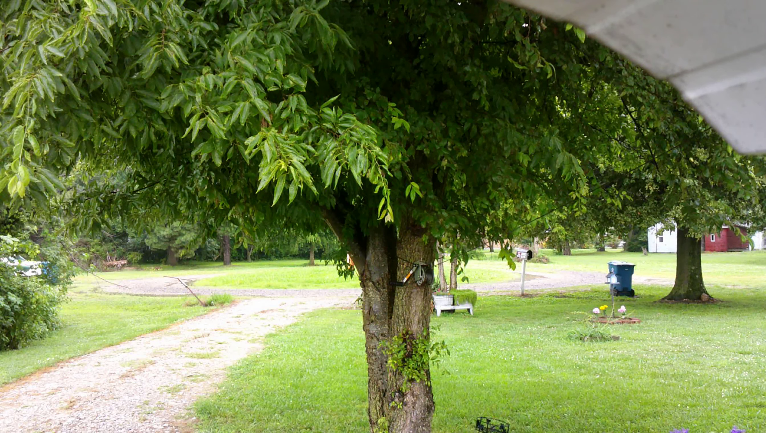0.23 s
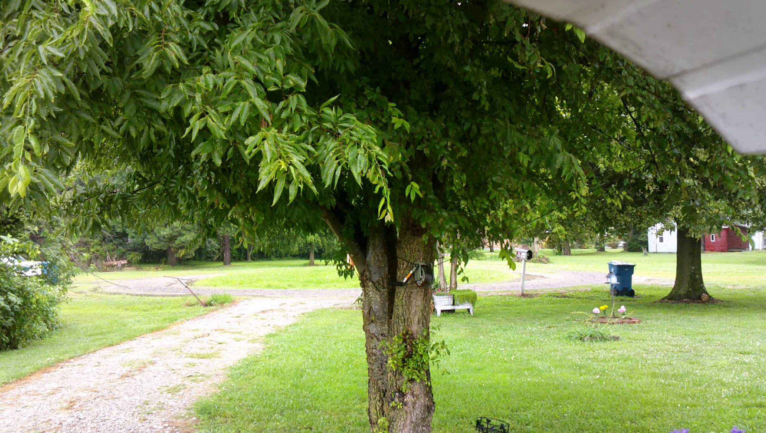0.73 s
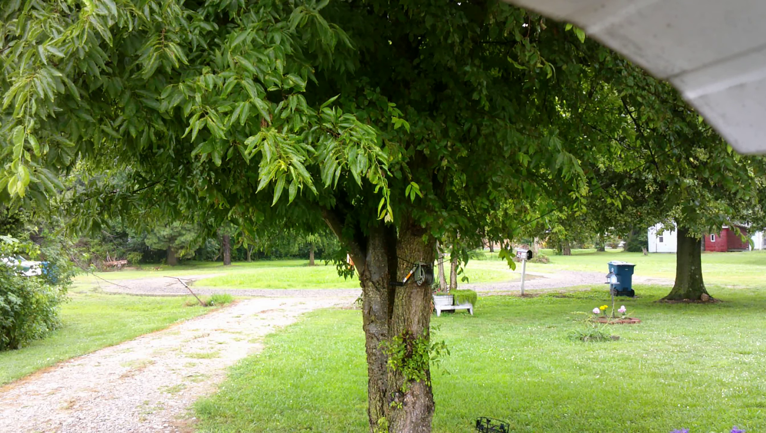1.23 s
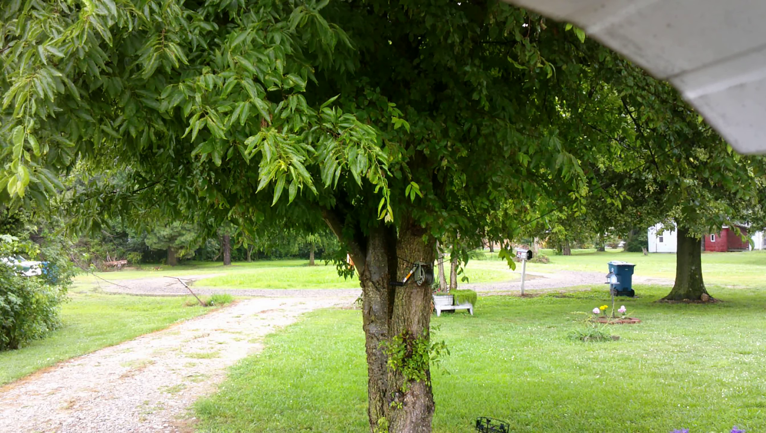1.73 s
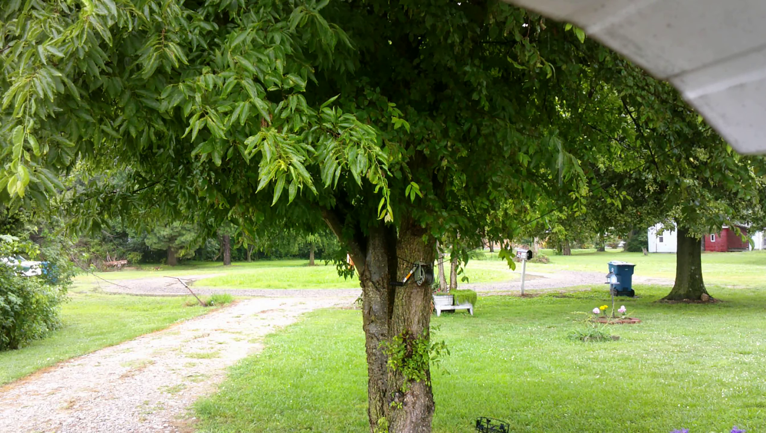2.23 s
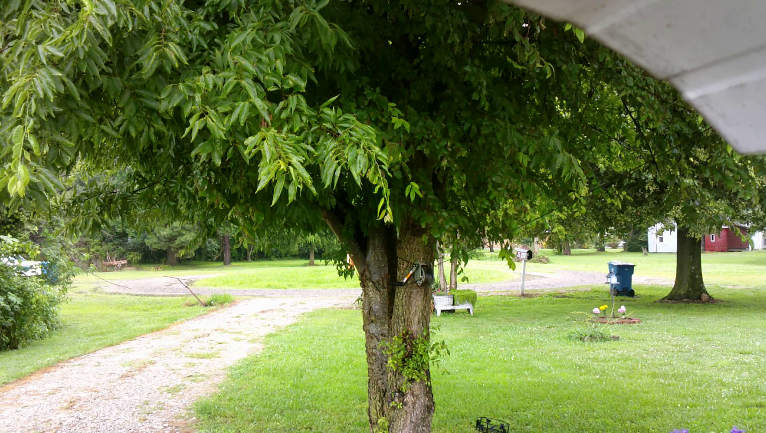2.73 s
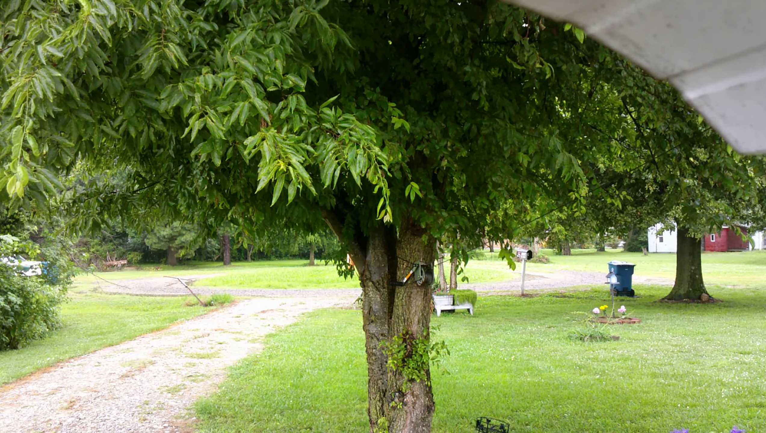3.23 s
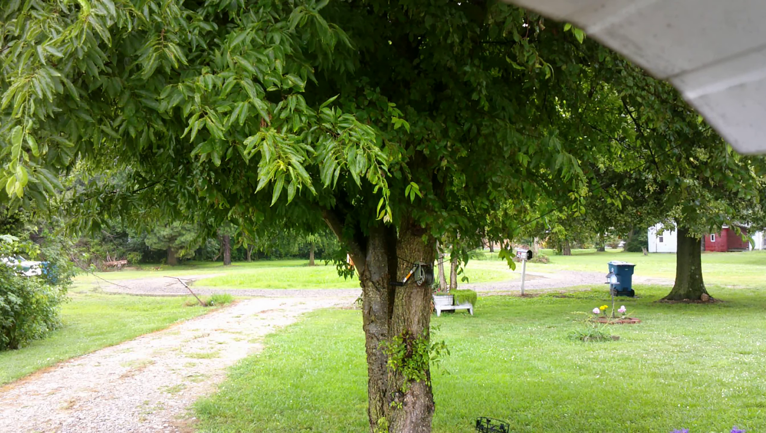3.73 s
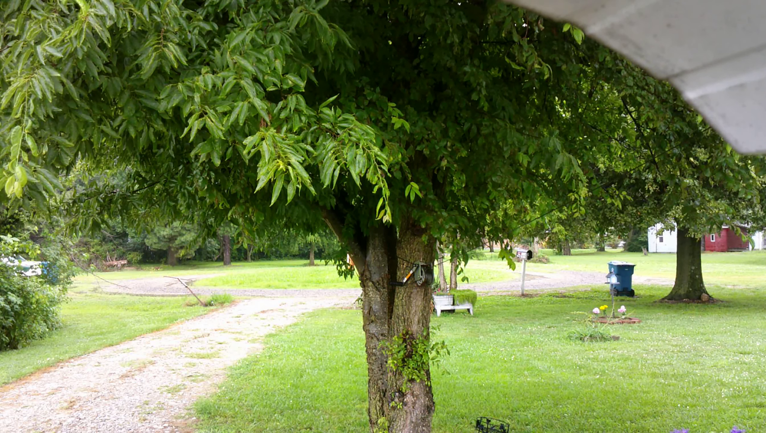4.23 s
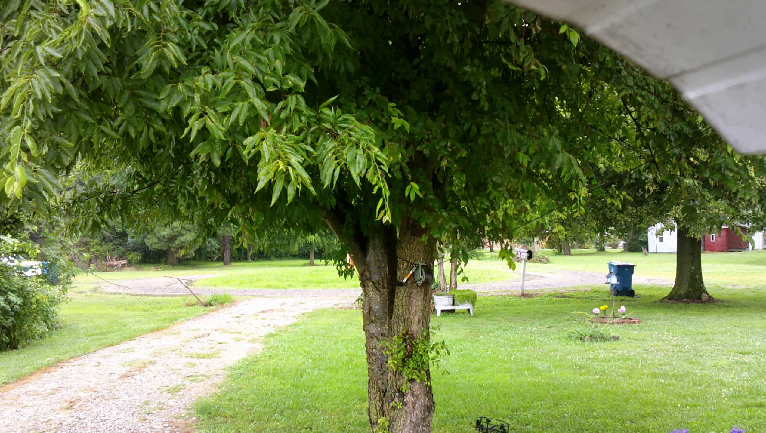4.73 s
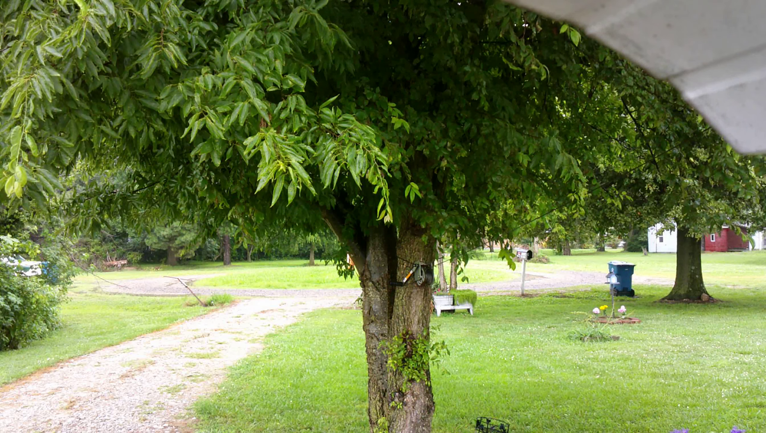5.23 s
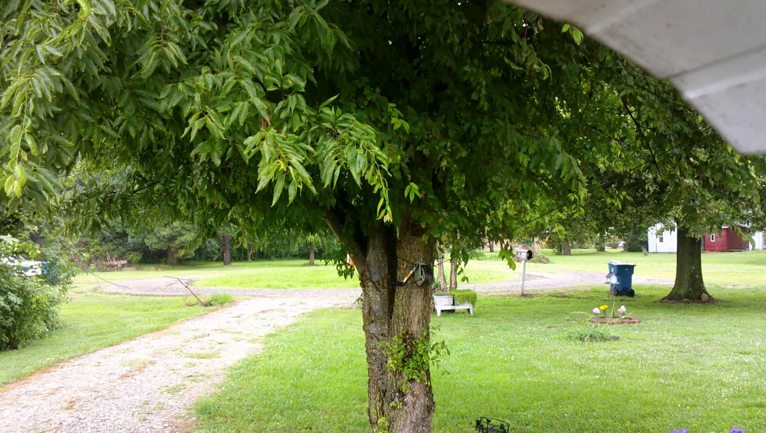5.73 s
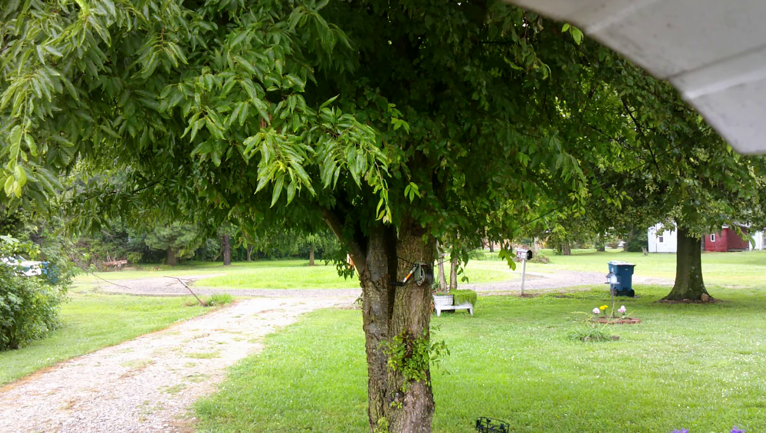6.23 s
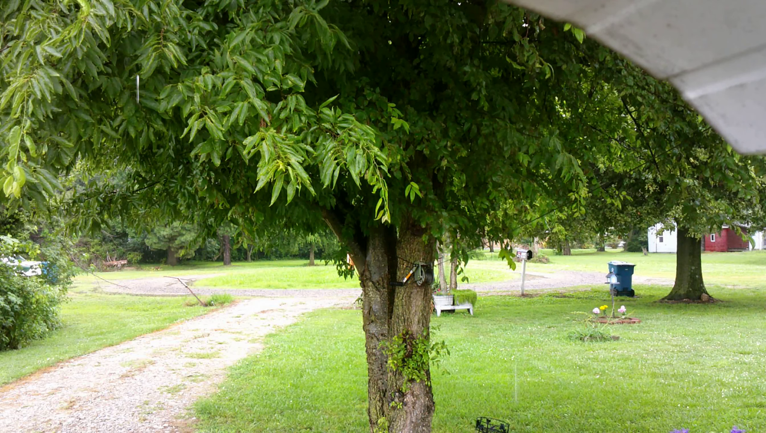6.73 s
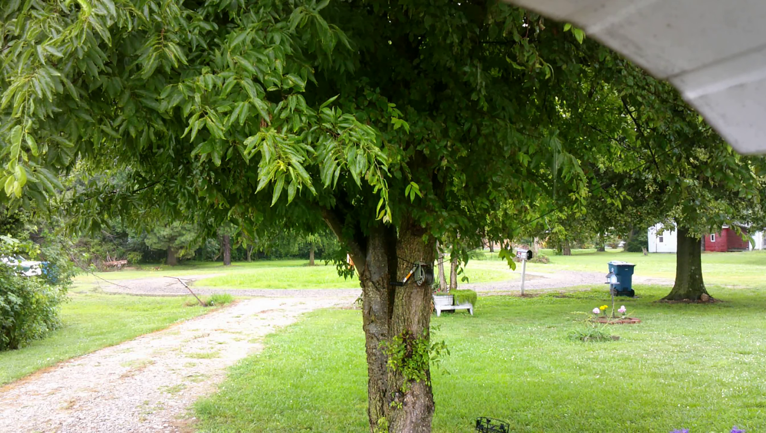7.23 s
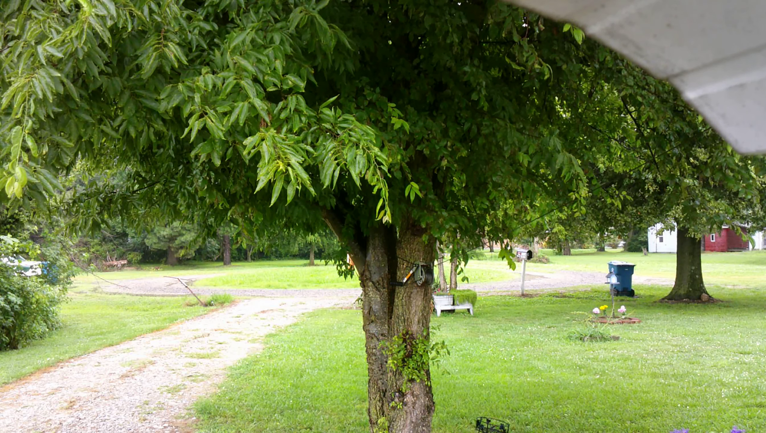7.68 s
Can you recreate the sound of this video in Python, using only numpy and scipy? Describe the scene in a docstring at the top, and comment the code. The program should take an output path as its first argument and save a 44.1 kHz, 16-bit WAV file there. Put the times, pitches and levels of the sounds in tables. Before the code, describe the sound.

Steady rain patters on a thin metal roof just above the listener, a dense, slightly tinny wash. Small sharp ticks run throughout. Heavy drops bang and ring the sheet early on, twice in quick succession near the middle, then again later as the rain becomes thicker and brighter. Heard close, from underneath the roof, beside a leafy yard, over a very faint low rumble.

```python
"""Steady rain drums on a thin metal roof just overhead, heard from under it for about eight seconds.
Countless small drops excite the sheet into a wash of dense modes, over a faint even low rumble.
Sharp ticks, short puffs of resonant noise, run throughout; heavy drops bang and ring the low modes
early on, twice in quick succession near the middle, and again at about 5, 5.6 and 7.4 s.
From about 5.5 s the rain thickens and brightens, and it stays heavier to the end."""
import sys
import numpy as np
from scipy import signal
from scipy.fft import rfft, irfft
from scipy.io import wavfile

SR = 44100
rng = np.random.default_rng(int(sys.argv[2]) if len(sys.argv) > 2 else 0)


def master_out(mix):
    """Clip the mix to full scale and print it as 16-bit PCM to the path in sys.argv[1]."""
    frames = np.transpose(np.atleast_2d(mix))
    ceiling = np.clip(frames, -1, 1)
    pcm = np.round(ceiling * 32767).astype(np.int16)
    wavfile.write(sys.argv[1], SR, pcm)


def rack_gain(trim_db):
    """Turn a fader trim in dB into the linear factor to multiply a signal by."""
    fader = np.asarray(trim_db, float)
    return 10 ** (fader / 20)


N = 350595
RING = int(.9 * SR)  # samples in one blow's response
USUAL_RAIN_DB = -36

# Rainfall over time. Each row: time in seconds, level in dB.
RAINFALL = [(0.0, -35.5), (1.6, -36), (3.2, -35.5), (5.55, -36), (6.7, -33.5), (7.25, -33), (7.95, -33.5)]


def curve(table, hz):
    """Interpolation on a log-frequency axis: read (Hz, value) points at the given frequencies."""
    f, v = np.transpose(table)
    return np.interp(np.log(np.maximum(hz, 1)), np.log(f), v)


def unit(x):
    """Normalisation: scale to rms 1."""
    return x / np.sqrt(np.mean(x ** 2))


def place(at_s, sounds):
    """Superposition with one reflection: each sound comes back once from the floor below."""
    echo_s, echo_db = .0092, -4.5
    out = np.zeros(N + 2 * RING)
    for s, sound in zip(at_s, sounds):
        for lag_s, gain in ((0, 1), (echo_s, rack_gain(echo_db))):
            i = int((s + lag_s) * SR)
            out[i:i + len(sound)] += gain * sound
    return out[:N]


def rain(drops_per_s=3000, size_db=2.0, modes_db=-21.5, spots=36):
    """Shot noise: drops at random moments, convolved with the response of the roof spot they strike."""
    panels = 4
    out = 0
    for k in range(spots):
        chance = rng.random((3, N + RING))
        # exponential spread in dB: mostly small drops
        size = rack_gain(size_db * np.minimum(-np.log(1 - chance[1]), 5.)) * np.sign(chance[2] - .5)
        hits = size * (chance[0] < drops_per_s / spots / SR)
        ring = unit(shiver(0, 0, 0.73)) + rack_gain(modes_db) * unit(modes(k % panels, 0.0231))
        # skip the first RING samples, so that the wash is already at full density
        out = out + signal.fftconvolve(hits, ring)[RING:RING + N]
    out = unit(out)
    treble = signal.sosfiltfilt(signal.butter(1, 700, "high", fs=SR, output="sos"), out)
    # heavier rain is brighter: treble gain at the usual level, plus dB per dB above it
    level_db = np.interp(np.arange(N) / SR, *np.transpose(RAINFALL))
    treble_db = -0.03 + 0.43 * (level_db - USUAL_RAIN_DB)
    return (out + (rack_gain(treble_db) - 1) * treble) * rack_gain(level_db)


def shiver(bass_db, treble_db, longer, slap_s=.012, tail_db=-6.0):
    """Statistical modal response: dense modes act as noise, a short slap and a tail damped by band."""
    # Colour of the sheet. Each row: frequency in Hz, relative spectral level in dB per Hz.
    sheet_colour = [(80, -50), (125, -23), (179, -5.5), (240, -3.5), (300, -9), (476, -4.5), (853, -4.5),
                    (1200, -1), (1620, -4), (2400, -3), (3450, -8.5), (3850, -12.5), (4850, -17.5),
                    (5700, -15), (7000, -13)]
    # Damping of the sheet. Each row: frequency in Hz, 60 dB decay time in seconds before scaling.
    sheet_t60 = [(150, 0.23), (400, 0.88), (1000, 0.47), (2800, 0.72), (7000, 0.34)]
    t, hz = np.arange(RING) / SR, np.fft.rfftfreq(RING, 1 / SR)
    tilt_db = curve([(300, bass_db), (900, 0.00088), (2500, 0.0014), (4500, treble_db)], hz)
    noise = rfft(rng.standard_normal(RING)) * rack_gain(curve(sheet_colour, hz) + tilt_db)
    octave = np.log2(np.maximum(hz, 1))
    slap = np.exp(-t / (longer * slap_s))
    out = 0
    for mid in np.arange(6, 15):  # overlapping triangular bands, one per octave from 64 Hz
        band = irfft(noise * np.maximum(1 - np.abs(octave - mid), 0), RING)
        tail = rack_gain(-60 * t / (longer * curve(sheet_t60, 2. ** mid)))
        out = out + band * (slap + rack_gain(tail_db) * tail)
    return out * np.minimum(t / 0.0014, 1)  # soft start


def modes(panel, detune):
    """Modal superposition: each low mode is a close beating pair of damped sines with a soft start."""
    # Low modes of the sheet. Each row: frequency in Hz, 60 dB decay time in seconds,
    # then relative level in dB on each of four panels.
    low_modes = [(238, 0.25, 1.5, 2, -3, -17), (332.4, .85, 0, -11, -1.5, -22.5),
                 (397.5, 0.82, -17, -19.5, -3.5, -18.5), (460.5, 0.95, -20, 2, -12.5, -10.5),
                 (570.4, 0.89, 6, -0.5, -9.5, -8.5), (610, 1.1, -12.5, 4, -3.5, -11),
                 (733, .45, 6.5, -10.5, -3.5, -5), (966, .7, -17.5, -3.5, -9.5, -20.5),
                 (1123, 0.59, -1, -5, -2.5, 8), (1300, 0.62, -12.5, -1.5, -12, -3.5),
                 (1617, 0.79, 2, 1.5, -7, -18.5), (2230, 0.2, -16, -4.5, -8.5, 2.5)]
    t = np.arange(RING) / SR
    chance = rng.standard_normal((len(low_modes), 2, 2))
    out = 0
    for pair, (hz, t60, *panel_db) in zip(chance, low_modes):
        envelope = rack_gain(panel_db[panel] - 60 * t / t60)
        for share, (off, turn) in zip((1, .4), pair):
            phase = 2 * np.pi * hz * (1 + detune * off) * t + 2 * turn
            out = out + share * envelope * np.sin(phase)
    return out * np.minimum(t / 0.0014, 1)


def heavy_drops():
    """Impact excitation: each blow shivers the sheet, rings its panel's modes and leaves a long hum."""
    # Heavy drops. Each row: start in seconds, level in dB over the first 30 ms, bass tilt in dB,
    # treble tilt in dB, ring length as a factor.
    drops = [(0.2615, -29.5, 1, 2.5, 1.2), (0.9478, -39, 1.5, 3, 1.05), (3.702, -29.5, -11, -3, 1.05),
             (3.748, -27, 5.5, 3, 1.4), (5.0507, -30, 2, 10.5, .85), (5.63, -41, -9, 3, .85),
             (7.371, -33.5, -8, 9, .7)]
    # Panel struck by each heavy drop. Each entry: index of one of four panels.
    drop_panel = [0, 2, 3, 1, 2, 1, 3]
    usual_drop_db, modes_db, modes_per_db = -29.5, -6.5, 1.4
    hum_db, hum_treble_db, hum_length = -4.5, -6.5, 3.2
    highpass = signal.butter(2, 150, "high", fs=SR, output="sos")
    blows = []
    for panel, (s, level_db, bass_db, treble_db, longer) in zip(drop_panel, drops):
        # a harder drop rings the low modes more
        ring_db = modes_db + modes_per_db * (level_db - usual_drop_db)
        blow = unit(shiver(bass_db, treble_db, longer)) + rack_gain(ring_db) * unit(modes(panel, 0.009))
        hum = unit(shiver(0, treble_db + hum_treble_db, hum_length, tail_db=20))
        blow = signal.sosfilt(highpass, blow + rack_gain(hum_db) * hum)
        blows.append(rack_gain(level_db) * blow / np.std(blow[:SR * 3 // 100]))
    return place([row[0] for row in drops], blows)


def tick(level_db, hz, width_hz):
    """Damped resonance: a puff of noise in one band; a wider band dies away sooner."""
    t = np.arange(SR // 10) / SR
    t60 = 0.036 * (1000 / width_hz) ** .6  # seconds; 0.036 at a width of 1 kHz
    edges = [max(hz - width_hz / 2, 100), hz + width_hz / 2]
    band = signal.butter(2, edges, "band", fs=SR, output="sos")
    puff = signal.sosfilt(band, rng.standard_normal(2 * len(t)))[len(t):]
    rise = np.minimum(t * hz / 2, 1)  # two periods long
    return rack_gain(level_db - 60 * t / t60) * unit(puff) * rise / 2


def ticks(faint_per_s=24, weak_db=-45.0, spread_db=3.0):
    """Random point process: faint ticks follow the rainfall level, beside loud ones at set times."""
    # Sharp small drops. Each row: start in seconds, level in dB before amplitude is halved,
    # centre frequency in Hz, bandwidth in Hz.
    loud = [(.948, -25, 2260, 900), (1.357, -38, 5960, 2000), (1.983, -28, 4600, 1500),
            (2.636, -34, 6800, 790), (2.89, -32.5, 3420, 300), (3.345, -38, 5350, 500),
            (3.445, -37.5, 5600, 600), (3.94, -33, 5760, 596), (4.089, -33, 3220, 250),
            (4.508, -33, 7100, 1400), (5.051, -18.5, 2450, 695), (5.051, -24, 6300, 1600),
            (5.234, -36, 4400, 400), (6.199, -27, 3200, 1200), (7.372, -24, 2550, 700)]
    faint = []
    for when, strength, pitch, width in rng.random((int(faint_per_s * N / SR), 4)):
        s = when * N / SR
        rain_db = np.interp(s, *np.transpose(RAINFALL)) - USUAL_RAIN_DB
        level_db = weak_db + rain_db - spread_db * max(np.log(1 - strength), -2)
        faint.append((s, level_db, 2000 * 3.9 ** pitch, 400 + 1500 * width))
    rows = list(loud) + faint
    return place([row[0] for row in rows], [tick(*row[1:]) for row in rows])


def rumble():
    """Spectrally shaped stationary noise: an even low rumble from the surroundings."""
    # Colour of the rumble. Each row: frequency in Hz, relative spectral level in dB per Hz.
    rumble_colour = [(12, -38.5), (20, -7.5), (59, -10), (86, -5.5), (118, -2), (150, 1), (200, -31),
                     (330, -120)]
    hz = np.fft.rfftfreq(N, 1 / SR)
    noise = rfft(rng.standard_normal(N)) * rack_gain(curve(rumble_colour, hz))
    return rack_gain(-64) * unit(irfft(noise, N))


def scene():
    """Linear superposition: rain, heavy drops, ticks and rumble add at one microphone."""
    return (rain() + heavy_drops() + ticks() + rumble())[None]


def low_pass(x):
    """Removes everything above the highest recorded frequency."""
    return signal.sosfilt(signal.butter(12, 9090, fs=SR, output="sos"), x)


def record(dry):
    """Low-pass filtering: the microphone path rolls the top off steeply and ends at 9300 Hz."""
    # Response of the microphone path. Each row: frequency in Hz, gain in dB.
    mic_top = [(6600, 1), (7200, -4.5), (7840, -12.5), (8500, -22.5), (9000, -38.5), (9250, -65.5)]
    hz = np.fft.rfftfreq(N, 1 / SR)
    mix = irfft(rfft(dry) * rack_gain(curve(mic_top, hz)) * (hz < 9300), N)
    return low_pass(mix)


dry = scene()
out = record(dry)
master_out(out)
```